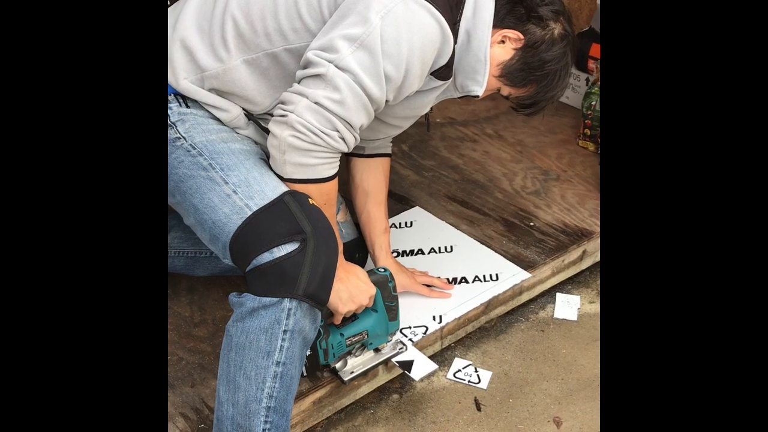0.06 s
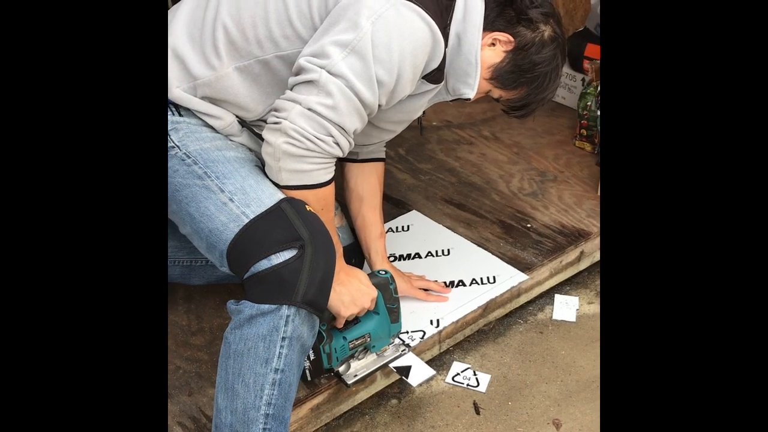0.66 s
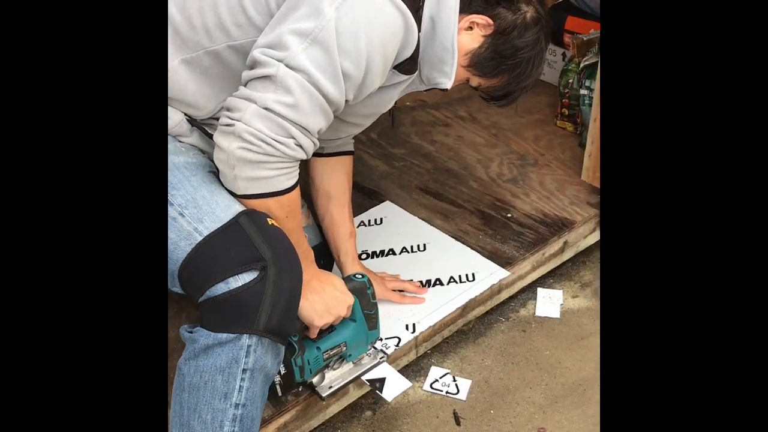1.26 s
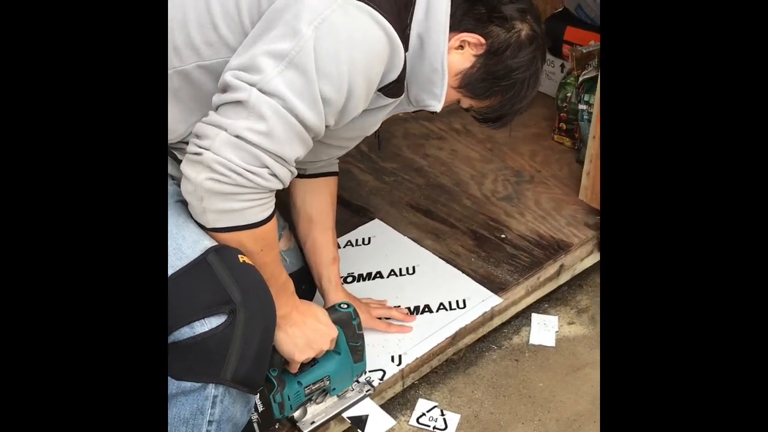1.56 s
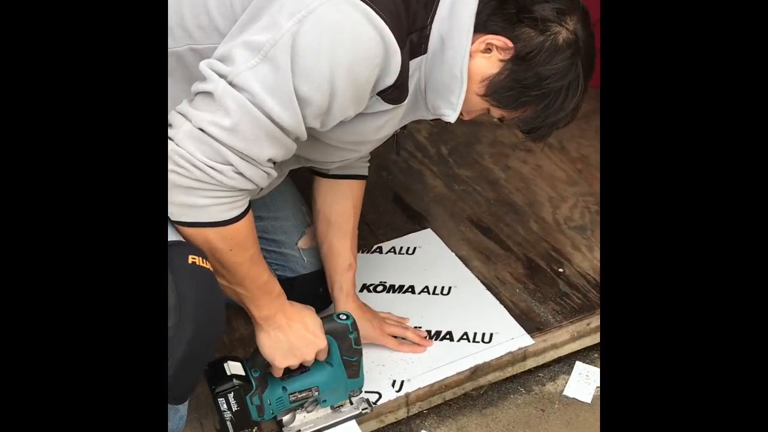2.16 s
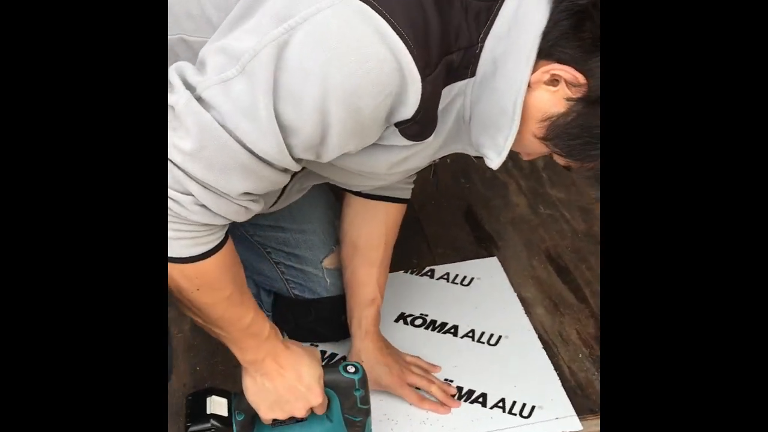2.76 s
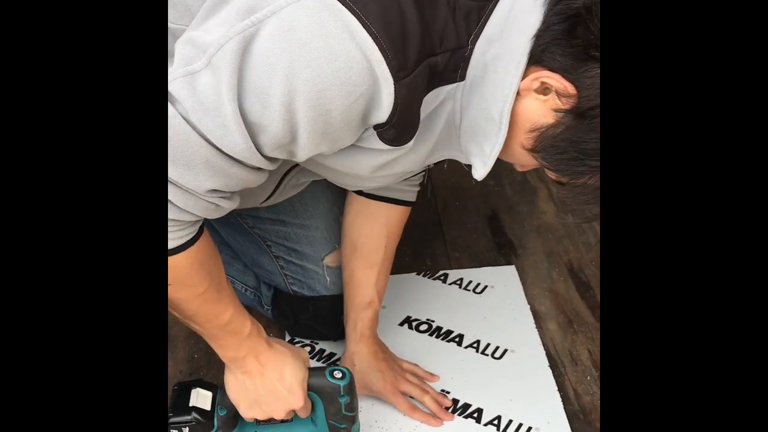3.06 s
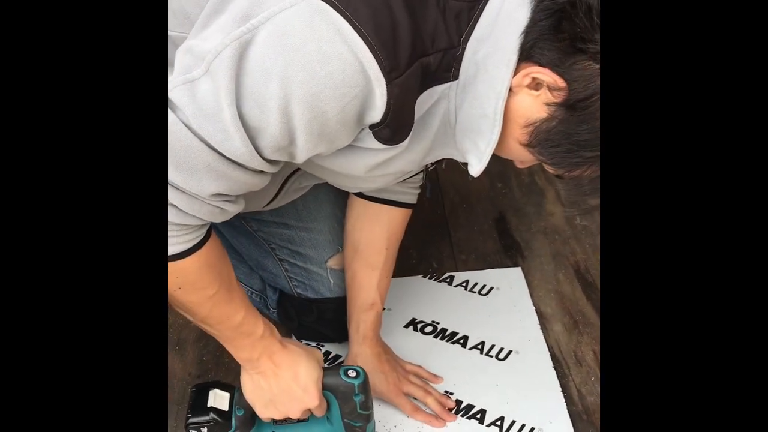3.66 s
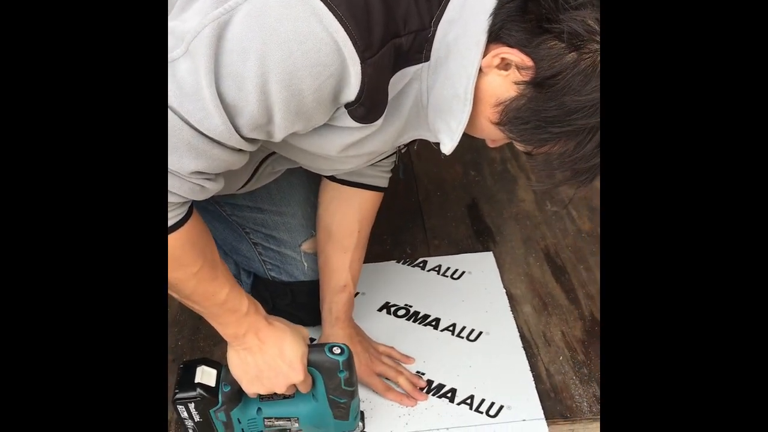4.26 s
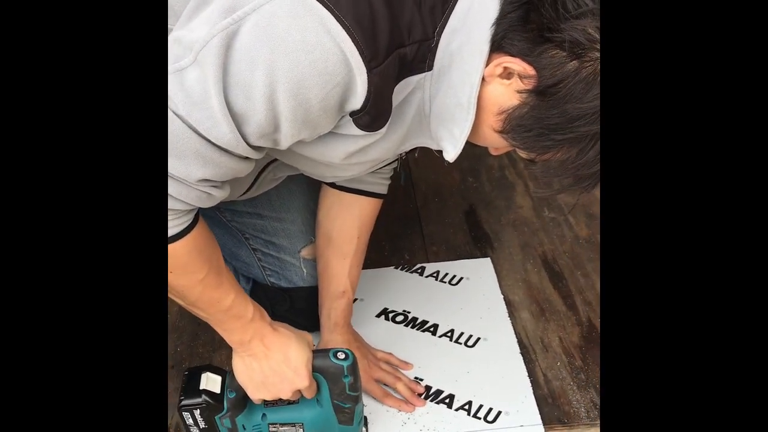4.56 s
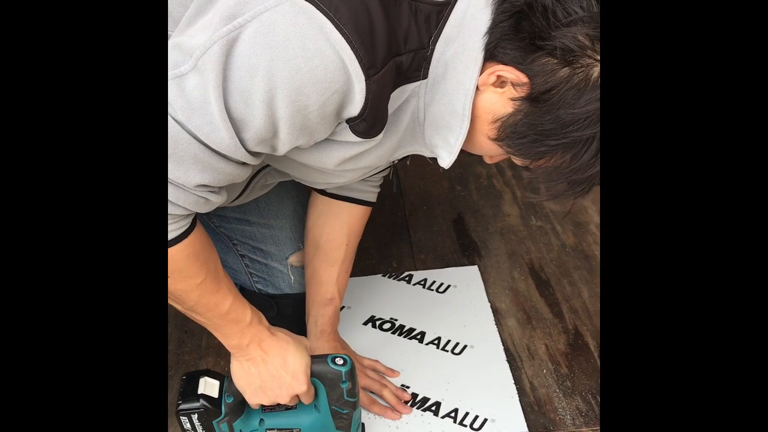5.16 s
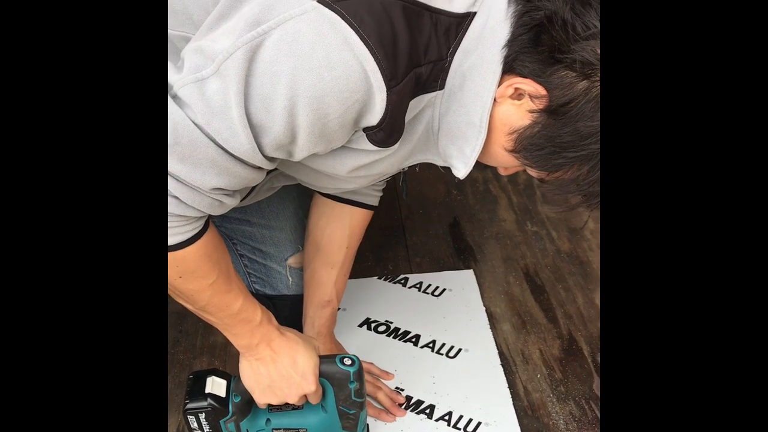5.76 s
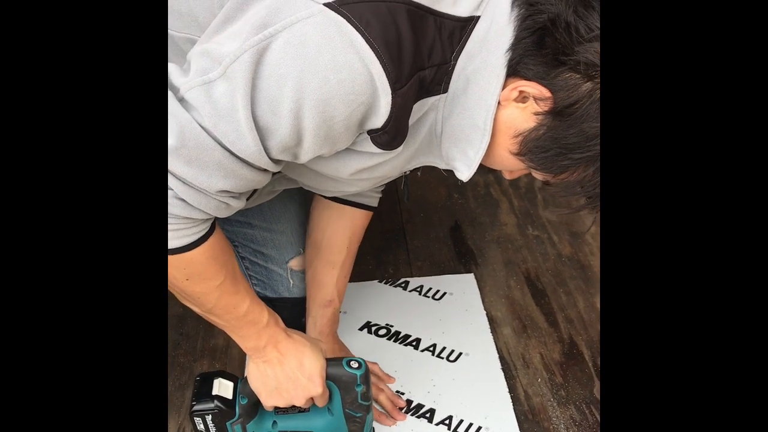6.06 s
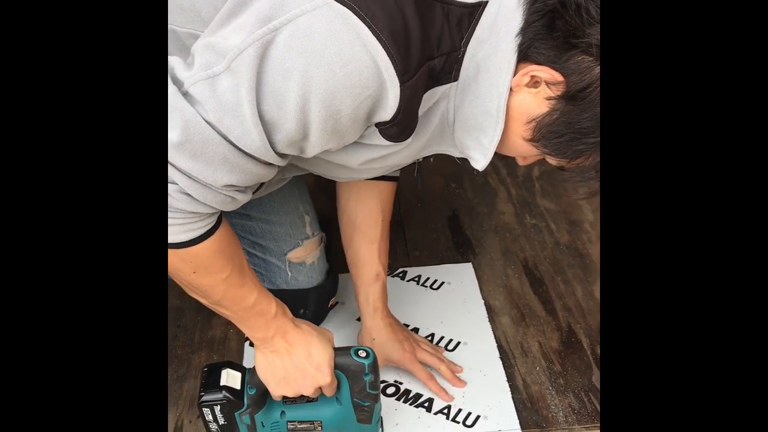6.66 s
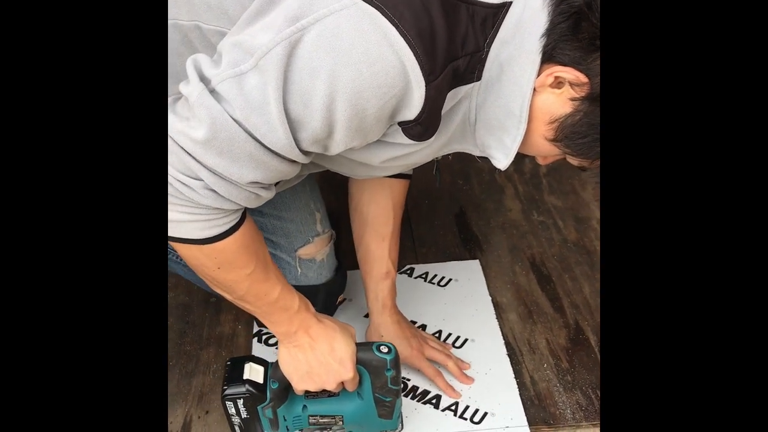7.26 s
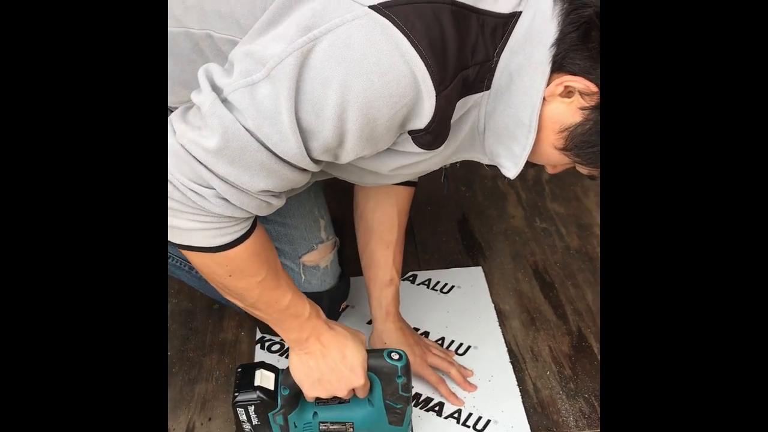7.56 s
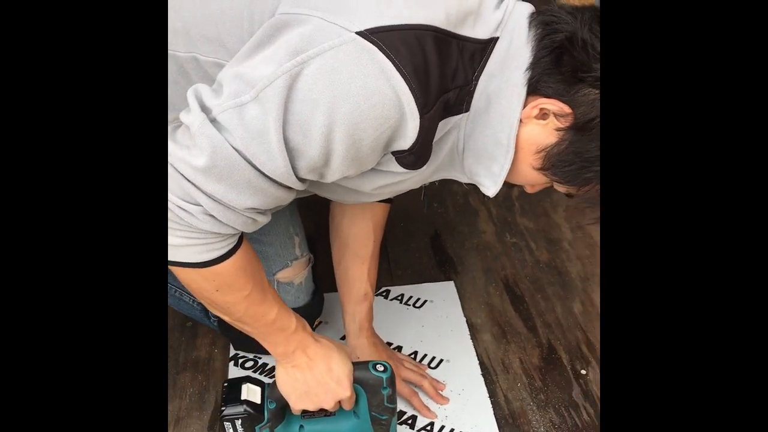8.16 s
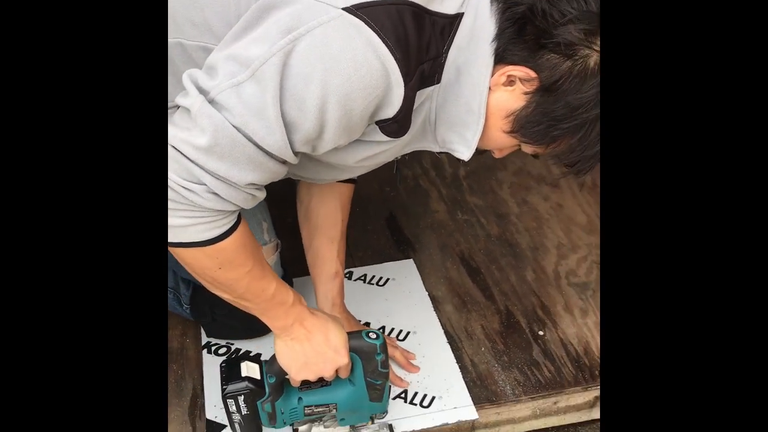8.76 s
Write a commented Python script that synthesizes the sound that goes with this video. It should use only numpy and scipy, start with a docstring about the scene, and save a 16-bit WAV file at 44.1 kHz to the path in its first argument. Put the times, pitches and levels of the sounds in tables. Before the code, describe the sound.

At the very start, the idling blade of a cordless jigsaw knocks against a loose aluminium composite sheet, making quick ringing thuds and a rasp. At about 0.2 seconds the motor runs up to a loud, even buzz. From 0.3 to 0.8 seconds the sheet chatters and squawks against its wooden bed. The saw then cuts steadily, with gritty rasping teeth, a motor hum and a faint rush from its fan. The sheet's bright metallic ring slowly shifts in colour, humming overtones swell and fade, and the blade sings thinly at times, around 1, 2, 4, 7 and 8.5 seconds. A shorter spell of chatter comes at about 1.5 seconds, two faint ones near 3.9 and 5.8 seconds, and a last one around 8.7 seconds. The saw is still cutting at the end, at 8.8 seconds. Everything sounds close and dry.

```python
"""A cordless jigsaw cuts an aluminium composite sheet on a wooden bed.
The idling blade first knocks the loose sheet: it rings and thuds, the teeth rasp, the motor's fan rushes.
At 0.23 s the motor runs up to about 96 strokes a second and hums; the sheet chatters and squawks.
Through the steady cut the sheet's resonances drift, stroke harmonics swell, and the blade sings at times.
Four shorter spells of chatter follow, the last just before the end at 8.8 s."""
import sys
import numpy as np
from scipy import signal
from scipy.fft import rfft, irfft, next_fast_len
from scipy.io import wavfile
from scipy.ndimage import uniform_filter1d, map_coordinates

SR = 44100
rng = np.random.default_rng(int(sys.argv[2]) if len(sys.argv) > 2 else 0)


def dump_mix(stems):
    """Bounce the given channels to the path in sys.argv[1] as a 16-bit WAV at rate SR."""
    frames = np.atleast_2d(stems).T  # one column per channel
    limited = np.clip(frames, -1, 1)  # hard clip at full scale
    pcm = np.round(limited * 32767).astype(np.int16)
    wavfile.write(sys.argv[1], SR, pcm)


N = 388521
TIME = np.arange(N) / SR
FFT_SIZE = next_fast_len(N + 4096, True)
HZ = np.fft.rfftfreq(FFT_SIZE, 1 / SR)
FIRST_BITE_S, CHATTER_FADE_S = 0.037, 0.14


def gain_of(db):
    """Decibels to amplitude."""
    return np.exp(np.asarray(db) * np.log(10) / 20)


def curves(rows):
    """Table columns, linearly interpolated over time."""
    times_s, *columns = np.transpose(rows)
    return [np.interp(TIME, times_s, column) for column in columns]


def steady(x, size=2400):
    """Normalise to unit running rms."""
    power = uniform_filter1d(uniform_filter1d(x ** 2, size), size)
    return x / np.sqrt(abs(power) + 1e-14)


def colour(x, points):
    """Filter by (frequency [Hz], gain [dB]) points."""
    hz, db = np.transpose(points)
    response = gain_of(np.interp(np.log(HZ + 1), np.log(hz), db))
    return irfft(rfft(x, FFT_SIZE) * response, FFT_SIZE)[:N]


def resonate(x, hz, width_hz):
    """Double-pole resonance; hz may be a curve."""
    carrier = np.exp(2j * np.pi * np.cumsum(hz * np.ones(len(x))) / SR)
    r = np.exp(-np.pi * width_hz / SR)
    return (carrier * signal.lfilter([(1 - r) ** 2], [1, -2 * r, r * r], x / carrier + 1e-18)).real


def blend(clean, rough, share):
    """Equal-power mix; share is the rough part."""
    share = np.clip(share, 0, 1)
    return np.sqrt(1 - share) * clean + np.sqrt(share) * rough


def drift(max_hz, count=24):
    """Slow random curve, unit rms."""
    times_s = np.linspace(0, TIME[-1], count * count)
    waves = np.sin(2 * np.pi * (max_hz * rng.random((count, 1)) * times_s + rng.random((count, 1))))
    return np.interp(TIME, times_s, waves.sum(0) * np.sqrt(2 / count))


def arch(peak_s, length_s):
    """Half-cosine swell, unit height."""
    return np.where(abs(TIME - peak_s) < length_s / 2, np.cos(np.pi * (TIME - peak_s) / length_s), 0)


def spell(start_s, end_s):
    """Unit gate with linear fades outside it."""
    return np.clip(1 + np.minimum(TIME - start_s, end_s - TIME) / CHATTER_FADE_S, 0, 1)


def throb(bounce_rad, depth):
    """Gain pulsing once a bounce, unit mean power."""
    return (1 + depth * np.cos(bounce_rad)) / np.sqrt(1 + depth ** 2 / 2)


# Cutting speed, sagging under the feed: (time [s], stroke rate [Hz])
CUT_SPEED = [(0.5, 96.45), (0.9, 97.39), (1.6, 96.47), (2.4, 96.66), (2.8, 96.59), (3.45, 96.01),
             (4.4, 96.34), (4.7, 96.03), (5.55, 96.26), (5.9, 95.88), (6.15, 96.26), (6.95, 96.08),
             (7.15, 95.72), (8.15, 95.99), (8.7, 95.51), (8.81, 95.54)]


def motor(idle_hz=44.74, trigger_s=0.232, run_up_s=0.048):
    """Idle on a half-pulled trigger, then run up. Returns stroke count and idling (1 to 0)."""
    idling = np.exp(-np.maximum(TIME - trigger_s, 0) / run_up_s)
    strokes = np.cumsum(idle_hz * idling + curves(CUT_SPEED)[0] * (1 - idling)) / SR
    return strokes - np.interp(FIRST_BITE_S, TIME, strokes) + 2, idling


def stroke_age(strokes, loose, jitter_s=0.00027):
    """Seconds since the last bite; a loose sheet is met early or late."""
    bites_s = np.interp(np.arange(1, int(strokes[-1]) + 1), strokes, TIME)
    bites_s += jitter_s * np.interp(bites_s, TIME, loose) ** 2 * rng.standard_normal(len(bites_s))
    bites_s = np.r_[-0.01, np.sort(bites_s)]
    return TIME - bites_s[np.searchsorted(bites_s, TIME, side="right") - 1]


def stroke_force(strokes, age_s, idling, loose, snatch_db=1.0):
    """Bites vary in force; the first barely touches, and the slow blade snatches at the edge."""
    uneven_db = (0.24 + 1.9 * loose) * rng.standard_normal(1000)[strokes.astype(int)]
    first_db = np.interp(strokes, [1.9, 2, 2.9, 3], [-8, -2, -2, 0])
    rest_db = np.interp(age_s, [0.011, 0.018], [0, -3])  # slow strokes die away before the next
    return gain_of(uniform_filter1d(uneven_db + first_db + rest_db + snatch_db * idling, size=40))


def tooth_bite(age_s, peak_s=0.00015, spread_s=0.00005):
    """The first tooth catches: one pulse a stroke."""
    pulse = np.exp(-((age_s - peak_s) / spread_s) ** 2)
    return steady(pulse - pulse.mean())


def knock(age_s, loose, decay_s, tail, change_hz):
    """Waves scattered by the sheet's edges: alike each stroke, slowly changing along the cut."""
    paths = rng.standard_normal((64, 1300))
    scatter = map_coordinates(paths, [TIME * change_hz, age_s * SR], order=2, mode="mirror")
    return steady(scatter * (np.exp(-age_s / decay_s) + tail * (1 + loose) * np.exp(-age_s / 0.032)))


def tear_chips(age_s, loose, decay_s=0.0046):
    """Teeth tear fresh chips, hardest at the bite; a loose sheet rattles between bites."""
    rattle = 0.99 * (1 + 2.5 * loose) * np.exp(-age_s / 0.1)
    return steady(rng.standard_normal(N) * (np.exp(-age_s / decay_s) + rattle))


def disperse(x, delay_at_1khz_s=0.0031):
    """Bending waves: treble outruns bass."""
    lag_rad = 4 * np.pi * delay_at_1khz_s * np.sqrt(HZ * 1000)
    return irfft(rfft(x, FFT_SIZE) * np.exp(-1j * lag_rad), FFT_SIZE)[:N]


# Sheet's two moving resonances: (time [s], centre [Hz], level before trim [dB])
LOW_RING = [(0.0, 1975, -31), (0.25, 1830, -21.5), (1.15, 1760, -22.5), (1.9, 1800, -18.5),
            (2.8, 1660, -22.5), (3.05, 1840, -22.5), (3.75, 1720, -22), (4.25, 1960, -27.8),
            (4.45, 1410, -30.9), (4.75, 1440, -27.2), (5.45, 2100, -26.5), (5.85, 1930, -23),
            (6.2, 1780, -27), (7.0, 1740, -26.5), (7.15, 1450, -21), (7.65, 1460, -18), (8.15, 1610, -20),
            (8.81, 1630, -23.5)]
MID_RING = [(0.0, 3040, -34.6), (0.3, 3140, -27.5), (0.85, 3200, -25.9), (1.0, 3060, -25.5),
            (1.45, 2680, -24), (2.1, 2870, -22), (2.5, 3260, -20.6), (2.95, 3000, -16.5),
            (3.4, 2960, -19.5), (3.95, 2960, -25), (4.45, 3320, -22), (5.15, 3040, -18.5),
            (5.6, 2720, -19.5), (6.15, 2960, -20.5), (7.65, 2640, -18.5), (7.85, 2800, -23),
            (8.35, 2990, -26), (8.81, 2710, -21)]
# Its stationary top resonance: (time [s], level before trim [dB])
TOP_RING = [(0.0, -32), (0.07, -31), (0.19, -33), (0.39, -25), (0.86, -32), (1.05, -23.5), (1.28, -25),
            (1.94, -20.5), (2.7, -24.5), (3.41, -31), (3.61, -24.5), (4.29, -19.5), (5.05, -24.5),
            (7.58, -20.5), (8.79, -21), (8.81, -22)]
# Low, mid, top resonance: (width [Hz]) and (trim [dB])
RING_WIDTH_HZ = [880, 1260, 1630]
RING_TRIM_DB = [-2.36, -1.0, -3.5]
# Sheet's dense modes: (frequency [Hz], gain [dB])
PLATE_SPECTRUM = [(300, -67), (850, -5), (1200, -1), (1500, 0.5), (2200, -4.5), (2800, -4), (3600, 2),
                  (4400, 7.5), (5100, -2.5), (6000, -27), (9000, -54)]


def sheet_ring(drive, top_hz=4394, dense_db=-8.5):
    """Three broad resonances over dense modes; the lower two move as the saw advances."""
    resonances = [curves(LOW_RING), curves(MID_RING), [top_hz, *curves(TOP_RING)]]
    radiated = colour(drive, [(60, -10), (500, -11), (1050, -8), (1400, 5.5)])  # thin plate: weak bass
    rings = sum(gain_of(db + trim_db) * steady(resonate(radiated, hz, width_hz))
                for (hz, db), width_hz, trim_db in zip(resonances, RING_WIDTH_HZ, RING_TRIM_DB))
    level = np.sqrt(sum(gain_of(db) ** 2 for _, db in resonances))
    return rings + gain_of(dense_db) * level * steady(colour(drive, PLATE_SPECTRUM))


# Modes of the lifted sheet: (centre [Hz], width [Hz], relative level [dB])
FREE_MODES = [(403, 62, -25.5), (621, 18, -24.5), (1580, 180, -20), (2155, 150, -20.5), (3590, 490, -25.5),
              (5280, 300, -26.5)]


def free_ring(drive, loose):
    """The less the sheet is pressed down, the more its own modes ring."""
    return loose ** 1.6 * sum(gain_of(db) * steady(resonate(drive, hz, width_hz), size=4800)
                              for hz, width_hz, db in FREE_MODES)


# Bed's ring: (frequency [Hz], gain [dB]) and (time [s], relative level [dB])
BED_SPECTRUM = [(60, -70), (400, -29), (520, -42), (570, 4.5), (700, 4), (830, -0.5), (1000, -3.5),
                (1130, -1.5), (1300, -3), (4000, -68)]
BED_LEVEL = [(0.0, -23.5), (0.14, -24), (0.37, -31), (0.42, -27), (0.81, -31), (0.93, -38), (1.33, -39),
             (1.42, -27.5), (1.99, -39), (4.05, -31.5), (4.09, -32.5), (5.72, -28.5), (5.96, -36),
             (6.75, -30), (7.39, -36.5), (8.46, -32.5), (8.66, -25), (8.81, -26)]


def bed_ring(drive, lifted, bounce_rad, trim_db=-0.83):
    """The wooden bed rings dully, pulsing as the sheet bounces."""
    level = gain_of(curves(BED_LEVEL)[0] + trim_db) * throb(bounce_rad, depth=0.52 * lifted)
    return level * steady(colour(drive, BED_SPECTRUM))


def chip_spray(age_s, peak_s=0.0034, spread_s=0.0022, grit_db=2.2):
    """Chips fly off in mid-stroke, each a tick of its own size."""
    sizes = gain_of(grit_db * np.repeat(rng.standard_normal(N // 24 + 1), 24)[:N])
    envelope = np.exp(-((age_s - peak_s) / spread_s) ** 2) + 0.65
    return steady(rng.standard_normal(N) * sizes * envelope)


def blade_twist(x, patch_db=1.8, size=512):
    """The blade twists in the kerf: narrow patches of treble swell and fade."""
    _, _, spectra = signal.stft(x, SR, nperseg=size)
    bins, frames = np.indices(spectra.shape)
    patches = map_coordinates(rng.standard_normal(spectra.shape), [bins / 4.4, frames / 38], order=2)
    return signal.istft(spectra * gain_of(patch_db * patches), SR, nperseg=size)[1][:N]


# Teeth's rasp: (frequency [Hz], gain [dB]) and (time [s], relative level [dB])
TEETH_SPECTRUM = [(1000, -26.5), (2200, 0.5), (4000, -5.5), (5400, -2.5), (6200, 0.5), (7300, 0),
                  (8500, -5), (9800, -3), (11500, -3.5), (13300, -5.5), (14700, -2.5), (16000, -7)]
TEETH_LEVEL = [(0.0, -17), (0.05, -26), (0.54, -19.5), (0.83, -21), (1.47, -19), (1.79, -20), (2.21, -19.5),
               (3.24, -20), (4.0, -19), (4.09, -20.5), (4.64, -19), (5.23, -20), (6.77, -20), (7.8, -20.5),
               (8.51, -19.5), (8.81, -19.5)]


def teeth_rasp(drive, age_s, trim_db=1.76):
    """Teeth rasp on the edge; towards the top, flying chips take over from the repeating knock."""
    knocks = colour(drive, [(7000, 0.5), (10000, 0.5), (13000, -5)])
    spray = colour(chip_spray(age_s), [(5000, -12.5), (10000, -9.5), (13000, -5.5)])
    rasp = blade_twist(colour(knocks + spray, TEETH_SPECTRUM))
    return gain_of(curves(TEETH_LEVEL)[0] + trim_db) * steady(rasp)


# Fan's rush: (frequency [Hz], gain [dB])
FAN_SPECTRUM = [(20, -20), (45, -33), (70, 7), (100, 6), (140, 11), (250, 4), (450, 5), (700, -7.5),
                (1500, -29)]


def fan(level_db=-52):
    """Cooling air rushes through the motor housing."""
    level = gain_of(level_db + 2.8 * drift(9.3))
    return level * steady(colour(rng.standard_normal(N), FAN_SPECTRUM), size=20000)


# Sheet striking its bed: (frequency [Hz], gain [dB])
THUD_SPECTRUM = [(40, -55), (70, -24), (100, -15), (160, -13), (220, -6), (300, -2), (420, 0), (520, -3),
                 (700, -14), (1500, -60)]


def thud(age_s, chips, idling, loose, base_db=-43.5, loose_db=22, idle_db=7):
    """The sheet thuds on its bed, most when loose and under the slow blade."""
    knocks = knock(age_s, loose, decay_s=0.006, tail=0.85, change_hz=0.902)
    blows = blend(knocks, chips, share=0.055 + 0.5 * loose)
    onset = np.clip(TIME / (3 * FIRST_BITE_S), 0, 1)  # the sheet takes a few strokes to get moving
    level = gain_of(base_db + loose_db * loose + idle_db * idling)
    return level * onset * steady(colour(blows, THUD_SPECTRUM))


def motor_kick(chips, idling, gain_db=-21):
    """The motor's kick knocks the sheet's lowest mode, hardest halfway up to speed."""
    kick = 4 * idling * (1 - idling)
    return gain_of(gain_db) * kick * steady(resonate(chips, hz=390, width_hz=220))


# Lasting harmonics of saw body and sheet: (stroke multiple, relative level [dB])
HUM_HARMONICS = [(2, -41), (3, -46.5), (4, -40), (5, -34.5), (7, -41), (13, -48), (16, -40), (27, -36)]
# Sheet modes drifting through harmonics: (peak [s], length [s], stroke multiple, relative level [dB])
HUM_SWELLS = [(1, 2.3, 3, -34.5), (1.256, 1.2, 23, -24), (1.497, 3.2, 4, -29), (1.85, 1.1, 20, -25.5),
              (1.895, 1.05, 2, -36.5), (2.404, 0.6, 17, -26.5), (3, 0.75, 30, -31), (3.1, 0.53, 19, -25),
              (3.6, 2, 27, -26.5), (3.994, 1.8, 2, -31.5), (4.35, 0.72, 16, -26.5), (4.35, .9, 7, -35),
              (4.8, 2.34, 13, -29.5), (5.395, 1.76, 4, -29), (5.7, 3, 3, -39.5), (5.95, 2.3, 27, -22.5),
              (5.8, 1.5, 16, -26), (6.61, 1.9, 7, -31.5), (6.898, 1.6, 16, -26.5), (7, 0.91, 5, -27.5),
              (7.7, 1.5, 49, -26.5), (8.303, 3.3, 5, -32.5), (8.214, 3.3, 13, -31.5),
              (8.704, 0.32, 3, -34.5)]
# Saw body's once-a-stroke shake: (time [s], relative level [dB])
BODY_SHAKE = [(0, -48.5), (1.5, -53), (5.3, -56.5), (6.2, -48), (7.3, -55.5), (8.81, -54)]


def hum(strokes, idling, loose, bounce_rad, loose_db=8, wander_db=2.0, waver_db=1.11):
    """Stroke harmonics swell as modes pass; a loose sheet lifts low ones, damps high ones, and throbs."""
    powers = {}
    for multiple, db in HUM_HARMONICS:
        order = round(multiple)
        lift_db = loose_db * loose * (2 < order < 8)
        powers[order] = gain_of(db + lift_db + wander_db * drift(2.5)) ** 2
    for peak_s, length_s, multiple, db in HUM_SWELLS:
        order = round(multiple)
        powers[order] = powers.get(order, 0) + (gain_of(db) * arch(peak_s, length_s)) ** 2
    out = gain_of(curves(BODY_SHAKE)[0] + 2.8 * drift(7)) * np.sin(2 * np.pi * strokes)
    for order, power in powers.items():
        pulsing = throb(bounce_rad + 2 * np.pi * rng.random(), depth=1.02 * loose)
        damping = 1 + 0.58 * loose * (order > 10)
        level = np.sqrt(power) * gain_of(waver_db * drift(8)) * pulsing / damping
        lag_cycles = 0.21 * np.sqrt(order)  # bending-wave delay
        out += level * np.cos(2 * np.pi * (order * strokes - lag_cycles))
    return np.sqrt(2) * out * (1 - idling) ** 6


# Sheet bouncing on its bed:
# (start [s], end [s], looseness [0-1], bounce rate [Hz], squawk's stroke multiple, relative level [dB])
CHATTER_SPELLS = [(0.329, 0.77, 0.51, 10.72, 7, -27), (1.42, 1.66, 0.29, 13.7, 6, -30),
                  (3.877, 3.973, 0.19, 9.8, 3, -41), (5.785, 5.86, 0.2, 11, 8, -41),
                  (8.62, 8.744, 0.15, 9.5, 6, -30)]


def chatter(idling, held_loose=0.034, idle_loose=0.57):
    """The sheet lifts in spells and under the idling blade. Returns looseness (0-1) and bounce phase."""
    loose, bounce_rad = np.maximum(held_loose, idle_loose * idling), np.zeros(N)
    for start_s, end_s, looseness, rate_hz, _, _ in CHATTER_SPELLS:
        loose = np.maximum(loose, looseness * spell(start_s, end_s))
        begun = TIME > start_s - CHATTER_FADE_S
        bounce_rad[begun] = 2 * np.pi * rate_hz * (TIME[begun] - start_s)
    return loose, bounce_rad


def squawk(strokes, idling, bounce_rad, bend_cycles=0.15):
    """The lifted sheet sounds one stroke harmonic a spell, louder and slightly flat at each bounce."""
    tones = np.zeros(N)
    for start_s, end_s, _, _, multiple, db in CHATTER_SPELLS:
        cycles = round(multiple) * strokes - bend_cycles * np.sin(bounce_rad)
        tones += gain_of(db) * spell(start_s, end_s) * np.sin(2 * np.pi * cycles)
    return np.sqrt(2) * tones * throb(bounce_rad, depth=0.8) * (1 - idling) ** 8


# Blade resonances: (peak [s], length [s], centre [Hz], width [Hz], relative level [dB])
BLADE_NOTES = [(1.1, .95, 11950, 500, -32), (1.25, 0.66, 5300, 400, -26.5), (2.102, 0.81, 7450, 400, -25.5),
               (2.9, .4, 14700, 700, -31), (3.6, .6, 9330, 450, -27.5), (3.943, .98, 7440, 450, -26),
               (4.35, 0.99, 6700, 500, -31), (4.65, 0.44, 8500, 350, -29), (6.25, 1, 7130, 400, -34),
               (6.8, .99, 9760, 380, -27), (8.452, 0.86, 7160, 1000, -27), (8.72, 0.41, 5500, 200, -29)]


def blade_sing(drive):
    """Narrow resonances swell and fade as the steel is pressed sideways in the kerf."""
    out = np.zeros(N)
    for peak_s, length_s, hz, width_hz, db in BLADE_NOTES:
        span = abs(TIME - peak_s) < length_s / 2
        ring = steady(resonate(drive[span], hz, width_hz))
        out[span] += gain_of(db) * arch(peak_s, length_s)[span] * ring
    return out


def scene():
    """One stroke cycle drives the sheet, its bed, the teeth and the blade."""
    strokes, idling = motor()
    loose, bounce_rad = chatter(idling)
    lifted = loose * (1 - idling)
    age_s = stroke_age(strokes, loose)
    bite = tooth_bite(age_s)
    scatter = knock(age_s, loose, decay_s=0.0024, tail=0.24, change_hz=1.689)
    chips = tear_chips(age_s, loose)
    sheet_knock = blend(bite, scatter, share=0.9 + 0.12 * loose)
    bed_knock = blend(bite, scatter, share=0.77 + 0.39 * loose)
    edge_knock = knock(age_s, loose, decay_s=0.0016, tail=0.56, change_hz=2.121)
    sheet_drive = disperse(blend(sheet_knock, chips, share=0.036 + 0.46 * loose))
    bed_drive = disperse(blend(bed_knock, chips, share=0.086 + 0.37 * loose))
    edge_drive = disperse(blend(edge_knock, chips, share=0.27 + 0.44 * loose))
    # a bouncing sheet trades its broad ring for its own narrow modes
    cutting = (gain_of(-2.5 * lifted) * sheet_ring(sheet_drive)
               + gain_of(1.5 * lifted) * free_ring(bed_drive, loose)
               + bed_ring(bed_drive, lifted, bounce_rad)
               + teeth_rasp(edge_drive, age_s)
               + thud(age_s, chips, idling, loose)
               + motor_kick(chips, idling)
               + blade_sing(blend(edge_drive, chips, share=0.099)))
    cutting *= stroke_force(strokes, age_s, idling, loose)
    tones = hum(strokes, idling, loose, bounce_rad) + squawk(strokes, idling, bounce_rad)
    return (cutting + tones + fan())[None]


def record(dry):
    """Steep low-pass at the top of the treble."""
    cutoff_hz = 15950
    taps = signal.firwin(801, cutoff_hz, window=("kaiser", 8), fs=SR)
    return signal.oaconvolve(dry, taps[None], "same")


dry = scene()
out = record(dry)
dump_mix(out)
```